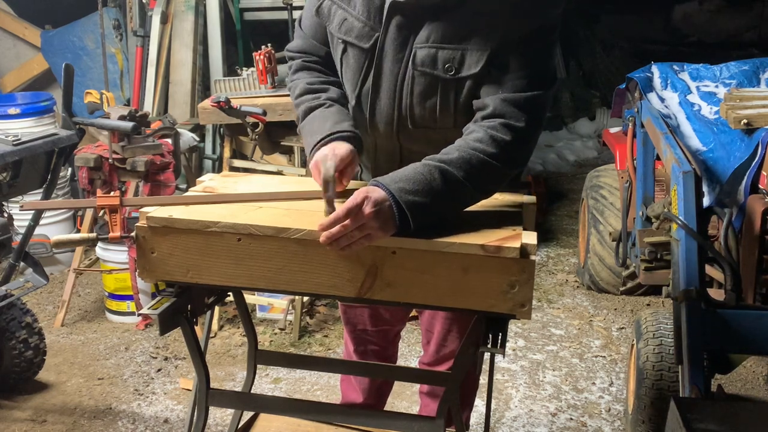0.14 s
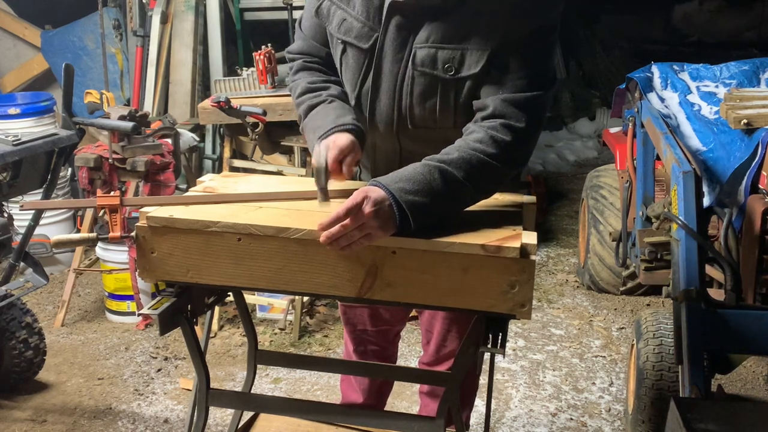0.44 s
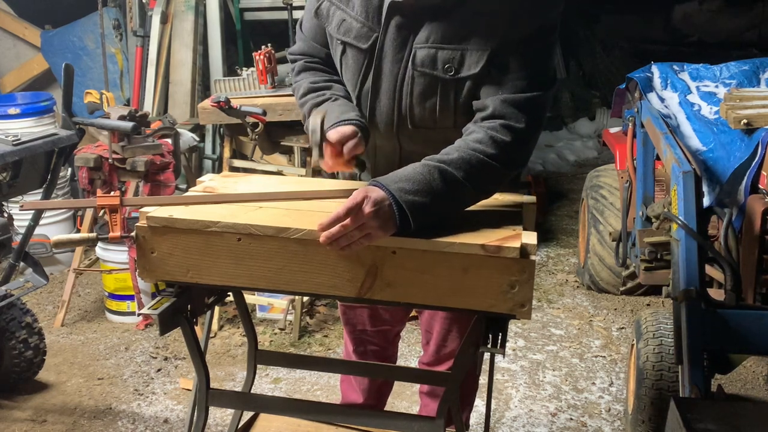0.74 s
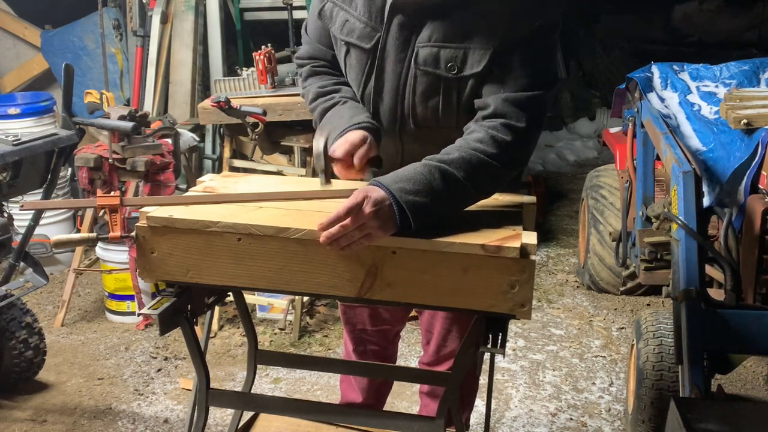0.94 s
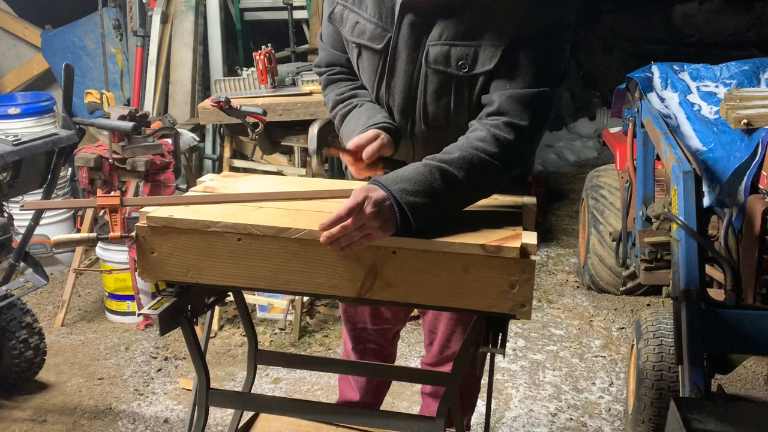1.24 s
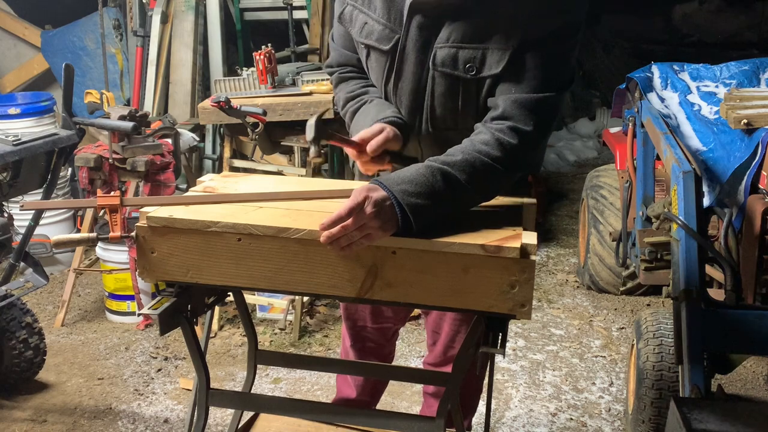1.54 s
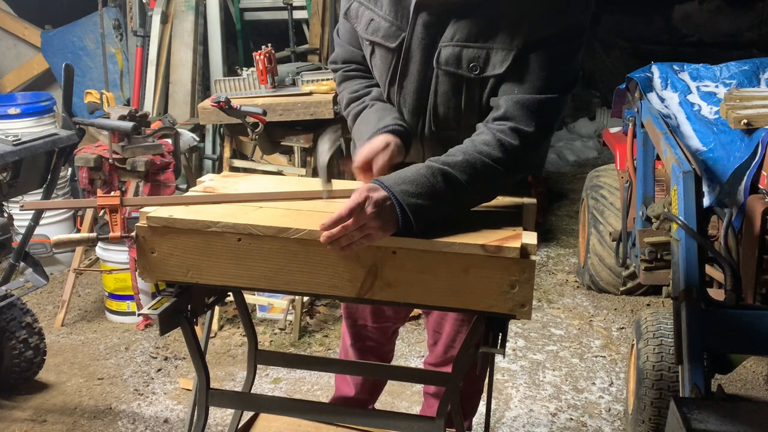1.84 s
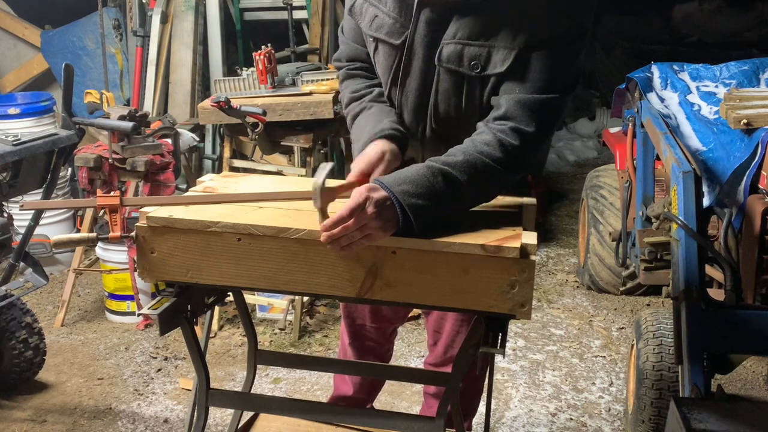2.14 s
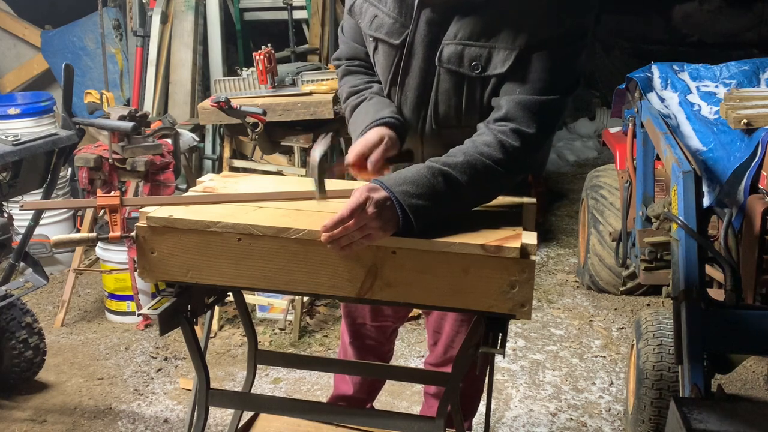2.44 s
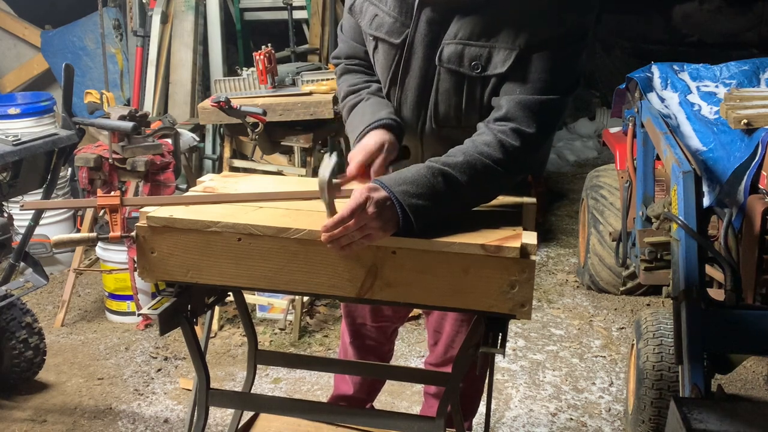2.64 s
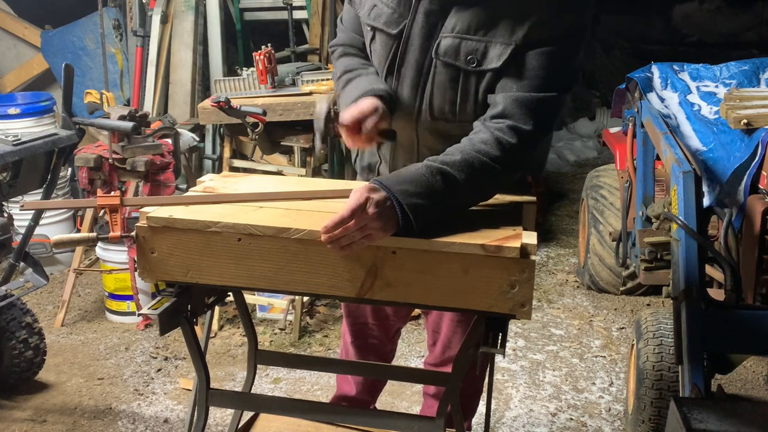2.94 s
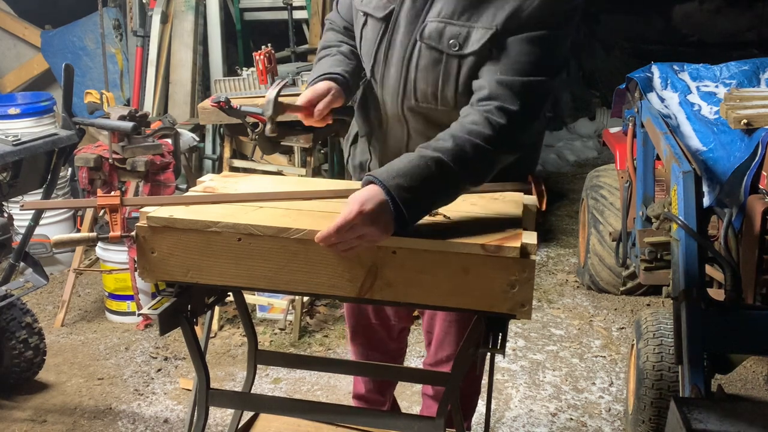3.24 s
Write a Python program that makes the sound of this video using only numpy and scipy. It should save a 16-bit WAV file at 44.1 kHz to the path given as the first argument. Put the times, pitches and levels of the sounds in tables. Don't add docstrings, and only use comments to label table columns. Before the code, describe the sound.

A hammer drives a nail into a clamped wooden box, about four sharp steel cracks a second, each with short garage echo; later blows thump lower, then loose tools rattle faintly. Close microphone, low wind rumble.

```python
import sys
import numpy as np
from scipy import signal
from scipy.fft import rfft, irfft
from scipy.io import wavfile

SR = 44100
rng = np.random.default_rng(int(sys.argv[2]) if len(sys.argv) > 2 else 0)


def transcribe(signal):
    frames = np.atleast_2d(signal).T
    limited = np.clip(frames, -1, 1)
    pcm = np.round(limited * 32767).astype(np.int16)
    wavfile.write(sys.argv[1], SR, pcm)


def makeup_ratio(level_db):
    decades = np.asarray(level_db, float) / 20
    return 10 ** decades


N = 149940

# pitch_hz, level_db [dB per Hz]
FLOOR_COLOUR = [(59, -18.5), (100, 8.5), (191, -10.5), (228, -3), (587, -5), (1240, -7.5), (2890, -21.5),
                (7140, -34), (10000, -56), (14300, -74), (22000, -120)]
# time_s, level_db
WIND_LEVEL = [(0, -47), (.5, -43.5), (.75, -40), (1.0, -45), (1.099, -53), (1.3, -46), (1.5, -45),
              (1.6, -45.5), (2.1, -54), (2.6, -43.5), (3.0, -45), (3.4, -64.5)]
# centre_s, level_db, half_length_s, top_hz
WIND_PUFFS = [(0.099, -44.5, 0.024, 300), (0.373, -29.5, 0.017, 248), (0.607, -26, 0.011, 300),
              (0.759, -37, 0.08, 247), (0.833, -30.5, 0.032, 300), (0.825, -38.5, .012, 750),
              (0.854, -37, 0.012, 600), (0.965, -31, 0.015, 210), (1.024, -31, 0.0033, 247),
              (1.327, -47, 0.026, 198), (1.771, -36.5, 0.014, 200), (1.83, -29.5, 0.0086, 257),
              (1.849, -26.5, 0.012, 245), (1.938, -31, 0.018, 300), (1.987, -22, 0.013, 396),
              (2.013, -29, 0.0099, 485), (2.049, -38.5, .03, 149), (2.109, -28, 0.0053, 370),
              (2.259, -33, 0.019, 300), (2.285, -31.5, 0.01, 383), (2.737, -37.5, 0.066, 206),
              (2.905, -39.5, 0.019, 151), (3.084, -54, 0.0084, 150), (3.134, -48, 0.018, 142.5)]
# start_s, level_db
LEAD_INS = [(0.118, -50.5), (0.365, -46.5), (0.599, -48), (0.852, -51), (1.115, -51.5), (1.351, -51),
            (1.604, -49.5), (1.851, -46.5), (2.091, -54), (2.327, -55.5), (2.559, -54.5), (2.791, -45)]
# crack_db, echo_db, seating [0 proud, 1 seated, 2 flush], thump_db
EARLIER_BLOW = (-5, -7.5, 0.3, -30)
# start_s, crack_db, echo_db, seating [0 proud, 1 seated, 2 flush], thump_db
HAMMER_BLOWS = [(0.14, -6, -7, 0.3, -30), (0.3877, -7, -6, 0.29, -38), (.622, -6, -6.5, 0.31, -22),
                (0.8741, -6, -6.5, 0.18, -15.5), (1.1364, -8, -7, 0.22, -25), (1.3743, -8, -7.5, 0.43, -25),
                (1.6261, -11.5, -9, 0.56, -13), (1.8746, -9, -10.5, 0.79, -3),
                (2.1146, -9, -12.5, 0.87, -6.5), (2.349, -7, -13.5, 1.03, -2), (2.581, -7, -10, 1.02, -3.5),
                (2.812, -8, -2.5, 5.7, -18.5)]
# crack_brightness_db, echo_brightness_db, wood_db
BLOW_CONTACT = [(0, 3, -20), (1, 6, -15), (-3.5, 7, -17.5), (-7, 5.5, -15), (-8.5, 8.5, -14.5),
                (-4, 2.5, -15), (-4, 4, -15.5), (5, 7, -20.5), (3, 5.5, -27.5), (3.5, 3, -19.5),
                (5, 0.5, -14.5), (6, -2.5, -14), (-1, -0.5, -13)]
# pitch_hz, level_db [dB per Hz]
CRACK_COLOUR = [(180, -35), (300, -4.5), (1270, 5.5), (3360, 0), (4690, -6.5), (5550, 0.5), (8730, -10.5),
                (12200, -17.5), (16500, -34.5)]
# pitch_hz, width_hz, level_db
HEAD_MODES = [(2990, 240, 0.5), (3960, 380, -0.5), (4430, 180, -10.5), (6070, 250, -13.5)]
# pitch_hz, level_db, t60_s
PING_MODES = [(1250, -2, .024), (2900, -12, .012), (950, -7, .024), (1600, -8, .018)]
# pitch_hz, width_hz, level_db
PIPE_MODES = [(463, 25, -4), (1085, 30, -5), (1130, 40, -2), (1187, 40, -2), (1250, 50, -2), (1500, 60, -9),
              (2630, 22, -6), (3420, 25, -8), (5700, 90, -24), (6800, 90, -26), (2000, 6000, -25)]
# pitch_hz, level_db, t60_s
WOOD_MODES = [(150, -10, 0.085), (270, -8.5, 0.057), (355, -6.5, 0.14), (466, 4.5, 0.038), (600, 0.5, 0.03),
              (705, 4.5, 0.039), (822, -10.5, 0.058)]
# pitch_hz, level_db [dB per Hz]
ECHO_PROUD = [(47, -35), (80, -16.5), (422, -3), (820, -10), (1140, -4), (1340, -12), (1490, -1.5),
              (5050, -16.5), (16000, -51.5)]
ECHO_SEATED = [(47, -40.5), (80, -16), (296, -2), (563, -12), (1140, -8.5), (2180, -14.5), (3100, -16.5),
               (7530, -20), (16000, -46.5)]
ECHO_FLUSH = [(47, -47), (80, -21), (232, -3.5), (718, -3.5), (1310, -3.5), (1700, -13.5), (1900, -7),
              (6890, -21), (16000, -40)]
# pitch_hz, width_hz, level_db
BOX_MODES = [(149, 57, -1), (267, 50, -3), (300, 40, -7), (365, 13, 0.5), (470, 38, 1.5), (531.5, 42, -4.5),
             (600, 24, -7), (647, 48, -5.5), (701, 49, -5)]
# pitch_hz, width_hz, level_db
NAIL_MODES = [(1110, 35, -3), (1124, 49, 5.5), (1191, 68, 6.5), (1244, 25, -1.5), (1240, 30, -2),
              (1243, 800, -2.5), (1532, 22, -1.5), (1530, 34, -7), (1650, 38, -1.5), (954, 13, -6),
              (1810, 83, -3), (2630, 28, -9), (2830, 46, -7), (3077, 40, -2.5)]
# pitch_hz, t60_s
GARAGE_DECAY = [(150, 0.18), (400, 0.24), (1100, 0.14), (3000, 0.16), (7000, 0.15), (11000, 0.12),
                (15000, .13)]
# start_s, level_db, fade_s, top_hz
TOOL_TICKS = [
    (1.344, -30.5, 0.032, 650),
    (2.711, -46, 0.021, 3980),
    (2.942, -41.5, 0.011, 5770),
    (2.978, -43, 0.0089, 6400),
    (2.991, -43, 0.037, 3930),
    (3.0117, -45.5, 0.0063, 6450),
    (3.036, -45, 0.011, 5560),
    (3.055, -55, 0.022, 4460),
    (3.159, -67, .006, 8130),
    (3.39, -62.5, 0.025, 3840),
]
# pitch_hz, width_hz, level_db
TOOL_MODES = [(4000, 600, 0), (5600, 700, 3), (7700, 900, -1), (3000, 500, 0), (1000, 2000, -2)]
# centre_s, level_db, half_length_s
HAND_SCUFFS = [
    (3.2, -73, .09),
    (3.3, -72, .06),
    (3.258, -68, .016),
    (3.318, -70, .009),
    (3.359, -69, .009),
]
# pitch_hz, width_hz, level_db
SCUFF_MODES = [(3270, 900, -3), (5000, 500, 0), (7000, 500, 0), (4470, 6000, -5), (10200, 1200, -11)]

FLOOR_DB, WIND_HZ, WIND_CUT_HZ = -58.5, 76, 50
EARLIER_S = -0.11
CRACK_S, CRACK_FADE_S, CRACK_CUT_HZ, BRIGHTER_DB = 0.001, 0.00013, 970, 9
SAME_CRACK, SAME_ECHO = 0.67, 0.72
BENCH_S, BENCH_DB, BENCH_TOP_HZ = 0.0046, -6, 8000
KNOCK_DB, KNOCK_FADE_S = -2, 0.0052
PIPES_DB, PIPES_T60_S, PIPES_LOSS_DB = -44.5, 1, 5.5
WOOD_AT_S, WOOD_RISE_S = 0.0018, 0.0016
THUMP_AT_S, THUMP_HZ, THUMP_WIDE_S = 0.0214, 300, 0.0014
FIRST_S, FIRST_DB = 0.00605, -13
FORE_S, FORE_DB = 0.0076, -6
ECHO_AT_S, ECHO_RISE_S, ECHO_TOP_HZ, GAP_DB, SEATED_GAP = 0.012, 0.0062, 15800, -8.5, 0.41
ECHO_HOLD_S, KNEE_S, SEATED_HOLD = 0.037, 0.0087, 0.79
LATE_DB, LATE_SLOWER, LATE_TOP_HZ = -26.5, 4.24, 8000
BOX_DB, NAIL_DB, NAIL_LOSS_DB, HEAD_DB, HEAD_ECHO_DB = -2, 2, 14.5, 5.5, 0
TICK_RISE_S, TICK_EDGE_HZ = 0.001, 10000
CEILING, TOP_HZ = 0.76, 15800
DROP_AT_S, DROP_S, DROP_DB = 3.379, 0.003, -34


def evened(x):
    return x / np.sqrt(np.mean(x ** 2) + 1e-20)


def read(points, hz):
    f, value = np.transpose(points)
    return np.interp(np.log(hz + 1), np.log(f + 1), value)


def add(mix, s, sound):
    at = round(s * SR)
    sound = sound[max(-at, 0):]
    part = mix[max(at, 0):][:len(sound)]
    part += sound[:len(part)]


def tinted(x, gain):
    hz = np.fft.rfftfreq(len(x), 1 / SR)
    return evened(irfft(rfft(x) * gain(hz), len(x)))


def peaks(table, hz):
    return sum(makeup_ratio(2 * db) / (1 + (2 * (hz - f) / width) ** 2) ** 2 for f, width, db in table)


def rings(table, t, detune):
    return sum(makeup_ratio(db - 60 * t / t60) * np.sin(2 * np.pi * hz * detune * t) for hz, db, t60 in table)


def treble(hz):
    return 1 / (1 + (6500 / (hz + 1)) ** 4)


def partly_shared(shared, share):
    return share * shared + np.sqrt(1 - share ** 2) * rng.standard_normal(len(shared))


def floor_noise():
    return makeup_ratio(FLOOR_DB) * tinted(rng.standard_normal(N), lambda hz: makeup_ratio(read(FLOOR_COLOUR, hz)))


def wind():
    def cut(hz):
        return hz ** 3 / (hz ** 3 + WIND_CUT_HZ ** 3)

    level = makeup_ratio(np.interp(np.arange(N) / SR, *np.transpose(WIND_LEVEL)))
    mix = level * tinted(rng.standard_normal(N), lambda hz: cut(hz) / (1 + (hz / WIND_HZ) ** 2))
    t = np.arange(-4096, 4096) / SR
    for s, db, half, top_hz in WIND_PUFFS:
        puff = tinted(rng.standard_normal(len(t)), lambda hz: cut(hz) / (1 + (hz / top_hz) ** 4))
        shape = np.exp(-0.5 * (t / half) ** 2)
        even = np.linalg.norm(shape) / np.linalg.norm(shape * puff)
        add(mix, s + t[0], makeup_ratio(db) * shape * puff * even)
    return mix


def lead_in(length):
    def colour(hz):
        band = hz / (hz + 1500) / (1 + (hz / 8500) ** 5)
        return band * (1 + 2.1 / (1 + ((hz - 3100) / 400) ** 2))

    t = np.arange(0, length, 1 / SR)
    smear = tinted(rng.standard_normal(2048), colour)[:len(t)]
    tick = 2 * np.exp(-((t - 0.001) / 0.0008) ** 2)
    bounce = 1.3 * np.exp(-((t - 0.001 - BENCH_S) / 0.0008) ** 2)
    rise = 2.5 * np.exp((t - length) / 0.003)
    return smear * (0.3 + tick + bounce + rise)


def strike_noise(driven, bright_db, shared):
    def colour(hz):
        db = read(CRACK_COLOUR, hz) + BRIGHTER_DB * driven * np.log2(1 + hz / 4000) + bright_db * treble(hz)
        head = np.sqrt(1 + makeup_ratio(2 * HEAD_DB) * peaks(HEAD_MODES, hz))
        return head * makeup_ratio(db) / (1 + (CRACK_CUT_HZ / (hz + 1)) ** 4)

    return tinted(partly_shared(shared[::-1], SAME_CRACK), colour)


def crack(hiss, t):
    burst = hiss * np.exp(-np.maximum(t - CRACK_S, 0) / CRACK_FADE_S) * np.minimum(t / 0.00087, 1)
    burst = burst * 1.95 / np.abs(burst).max()
    bounce = np.roll(burst, round(BENCH_S * SR))
    return burst + makeup_ratio(BENCH_DB) * signal.lfilter(*signal.butter(2, BENCH_TOP_HZ, fs=SR), bounce)


def knock(hiss, t):
    dull = tinted(hiss, lambda hz: 1 / (1 + (hz / 8500) ** 4))
    return dull * makeup_ratio(KNOCK_DB) * np.exp(-t / KNOCK_FADE_S)


def nail_ping(driven, t):
    rise = np.minimum(t / 0.0043, 1) ** 2
    return rings(PING_MODES, t, rng.uniform(0.92, 1.02)) * rise * makeup_ratio(7.5 - 8.1 * driven)


def clamp_pipes(driven, t):
    ringing = tinted(rng.standard_normal(len(t)), lambda hz: np.sqrt(peaks(PIPE_MODES, hz)))
    fade = makeup_ratio(PIPES_DB - PIPES_LOSS_DB * driven - 60 * t / PIPES_T60_S)
    return ringing * np.minimum(t / 0.019, 1) * fade


def wood_knock(wood_db, driven, t):
    after = np.maximum(t - WOOD_AT_S, 0)
    return makeup_ratio(wood_db) * rings(WOOD_MODES, after, 1 - 0.013 * driven) * np.minimum(after / WOOD_RISE_S, 1)


def box_thump(thump_db, t):
    def push(u):
        return np.exp(-0.5 * (u / THUMP_WIDE_S) ** 2) * np.sin(2 * np.pi * THUMP_HZ * u)

    first = makeup_ratio(FIRST_DB) * push(t - FIRST_S)
    fore = makeup_ratio(FORE_DB) * push(1.19 * (t - THUMP_AT_S + FORE_S))
    return makeup_ratio(thump_db) * (first + fore + push(t - THUMP_AT_S))


def wall_echo(seat, bright_db, shared):
    driven, flush = np.clip(seat, 0, 1), np.clip(seat - 1, 0, 1)
    seated = driven - flush

    def colour(hz):
        db = (1 - driven) * read(ECHO_PROUD, hz) + seated * read(ECHO_SEATED, hz) + flush * read(ECHO_FLUSH, hz)
        box = makeup_ratio(2 * BOX_DB + 24) * peaks(BOX_MODES, hz)
        nail = makeup_ratio(2 * (NAIL_DB - NAIL_LOSS_DB * driven) + 23) * peaks(NAIL_MODES, hz)
        lift = (1 + box + nail) * (1 + makeup_ratio(2 * HEAD_ECHO_DB) * peaks(HEAD_MODES, hz))
        return makeup_ratio(db + bright_db * treble(hz)) * np.sqrt(lift) * (hz < ECHO_TOP_HZ)

    noise = tinted(partly_shared(shared, SAME_ECHO), colour)
    f, t, z = signal.stft(noise, SR, nperseg=256, noverlap=192)
    late = t - ECHO_HOLD_S * (1 - (1 - SEATED_HOLD) * seated)
    fall_db = -30 * (late + np.sqrt(late ** 2 + KNEE_S ** 2)) / read(GARAGE_DECAY, f)[:, None]
    tail = makeup_ratio(LATE_DB + fall_db / LATE_SLOWER) / (1 + (f[:, None] / LATE_TOP_HZ) ** 4)
    x = signal.istft(z * (makeup_ratio(fall_db) + tail), SR, nperseg=256, noverlap=192)[1][:len(noise)]
    t = np.arange(len(x)) / SR
    rise = np.clip((t - ECHO_AT_S) / ECHO_RISE_S, 0, 1)
    gap_db = GAP_DB * (1 - (1 - SEATED_GAP) * seated)
    return x * makeup_ratio(gap_db * (2 - rise)) * np.minimum(t / 0.00042, 1)


def blow(crack_db, echo_db, seat, thump_db, bright_db, echo_bright_db, wood_db, shared):
    t = np.arange(len(shared)) / SR
    driven = np.clip(seat, 0, 1)
    hiss = strike_noise(driven, bright_db, shared)
    steel = makeup_ratio(crack_db) * (crack(hiss, t) + knock(hiss, t) + nail_ping(driven, t))
    box = wood_knock(wood_db, driven, t) + box_thump(thump_db, t)
    echo = makeup_ratio(echo_db) * wall_echo(seat, echo_bright_db, shared)
    return steel + clamp_pipes(driven, t) + box + echo


def hammer():
    mix, shared = np.zeros(N), rng.standard_normal(SR // 2)
    blows = [(EARLIER_S, *EARLIER_BLOW)] + list(HAMMER_BLOWS)
    for (s, *strength), contact in zip(blows, BLOW_CONTACT):
        add(mix, s, blow(*strength, *contact, shared))
    for s, db in LEAD_INS:
        length = min(b[0] - s for b in HAMMER_BLOWS if b[0] > s)
        add(mix, s, makeup_ratio(db) * lead_in(length))
    return mix


def tool_ticks():
    mix, t = np.zeros(N), np.arange(4096) / SR
    for s, db, fade, top_hz in TOOL_TICKS:
        def colour(hz):
            band = hz / (hz + 400) / (1 + (hz / top_hz) ** 2) / (1 + (hz / TICK_EDGE_HZ) ** 8)
            return np.sqrt(1 + 3 * peaks(TOOL_MODES, hz)) * band

        shape = np.exp(-t / fade) * np.minimum(t / TICK_RISE_S, 1)
        add(mix, s, makeup_ratio(db) * shape * tinted(rng.standard_normal(len(t)), colour))
    return mix


def hand_scuffs():
    t = np.arange(N) / SR
    swell = sum(makeup_ratio(db) * np.exp(-0.5 * ((t - s) / half) ** 2) for s, db, half in HAND_SCUFFS)
    return swell * tinted(rng.standard_normal(N), lambda hz: np.sqrt(peaks(SCUFF_MODES, hz)))


def scene():
    return (floor_noise() + wind() + hammer() + tool_ticks() + hand_scuffs())[None]


def low_pass(x):
    return signal.sosfilt(signal.butter(12, 17090, fs=SR, output="sos"), x)


def record(dry):
    drop = makeup_ratio(DROP_DB * np.exp(-np.abs(np.arange(N) / SR - DROP_AT_S) / DROP_S))
    x = dry * drop / (1 + np.abs(dry / CEILING) ** 4) ** 0.25
    x = signal.sosfilt(signal.butter(16, TOP_HZ, fs=SR, output="sos"), x)
    return low_pass(x)


dry = scene()
out = record(dry)
transcribe(out)
```